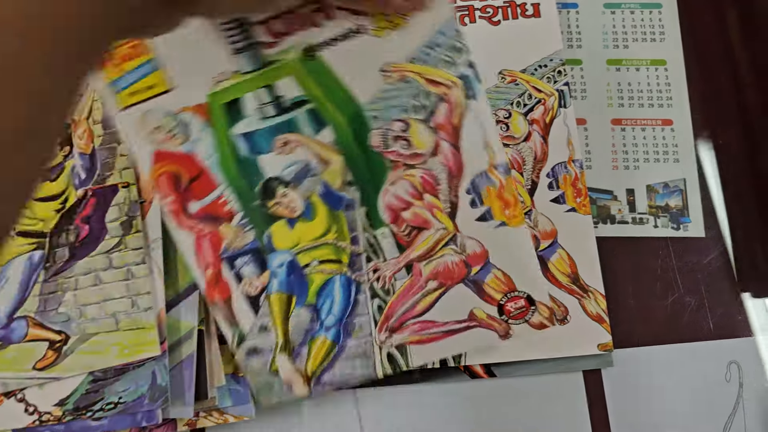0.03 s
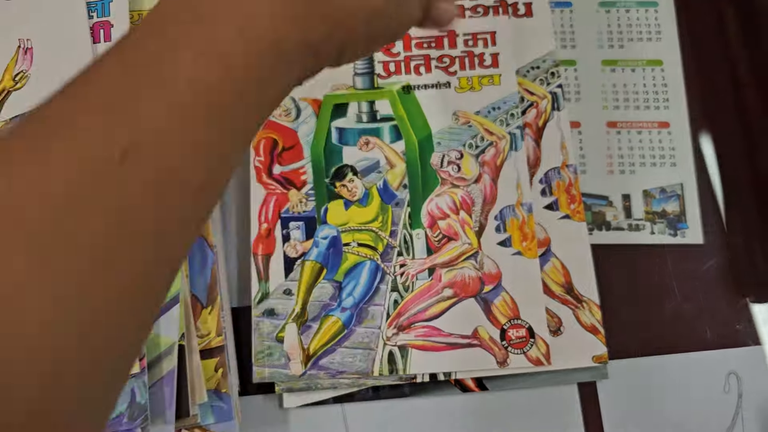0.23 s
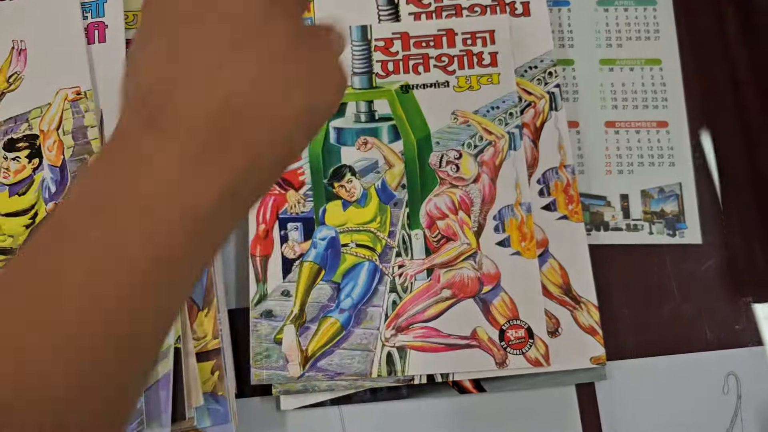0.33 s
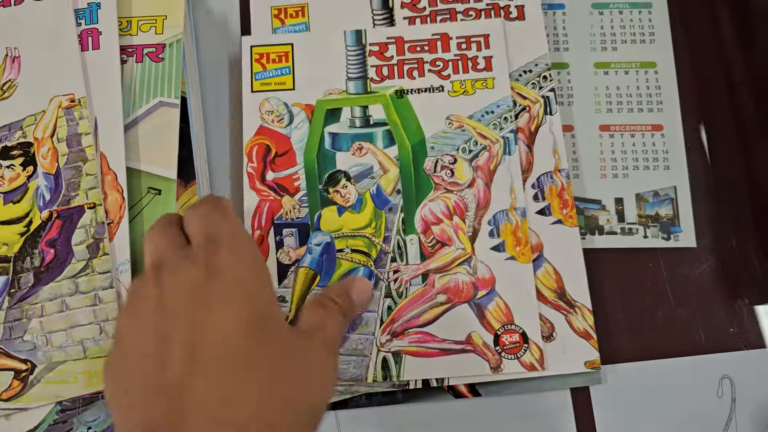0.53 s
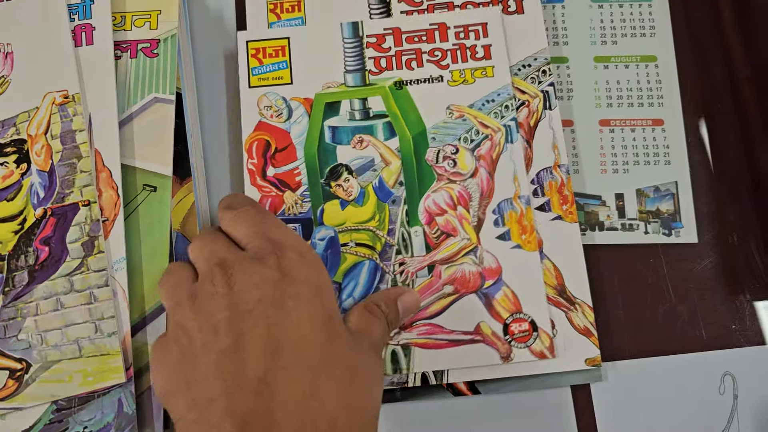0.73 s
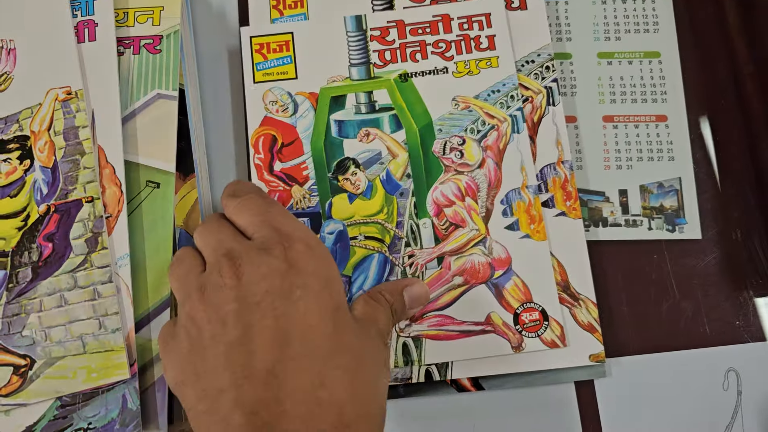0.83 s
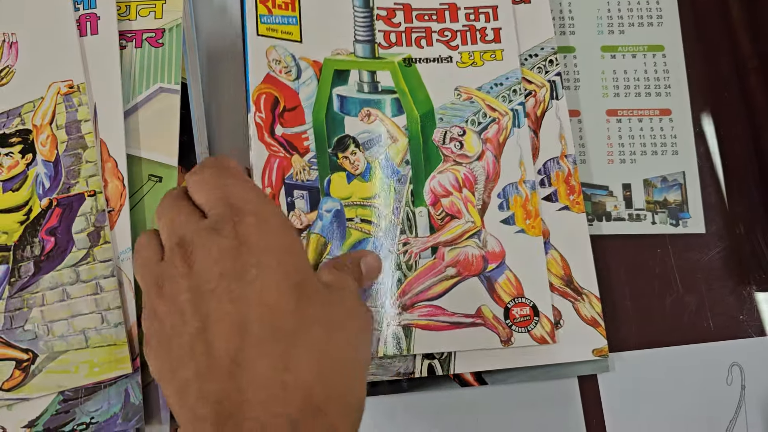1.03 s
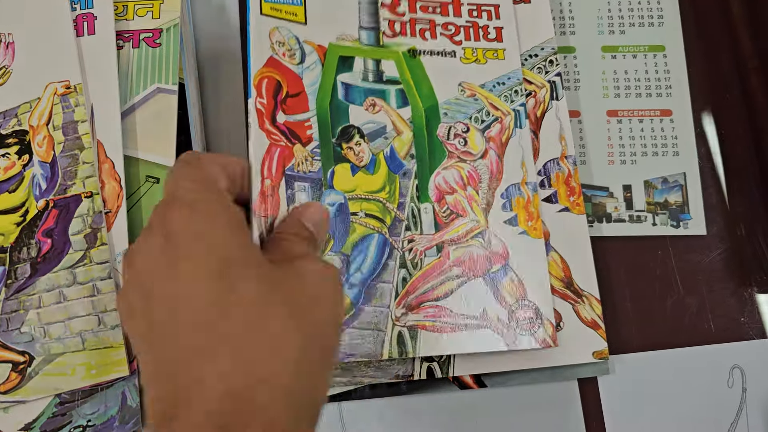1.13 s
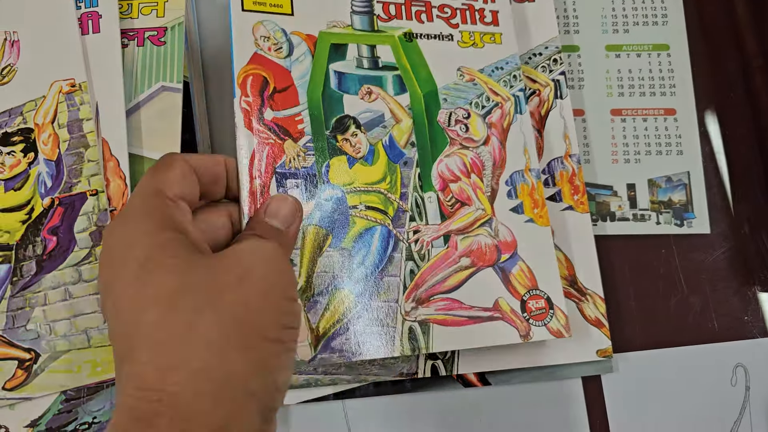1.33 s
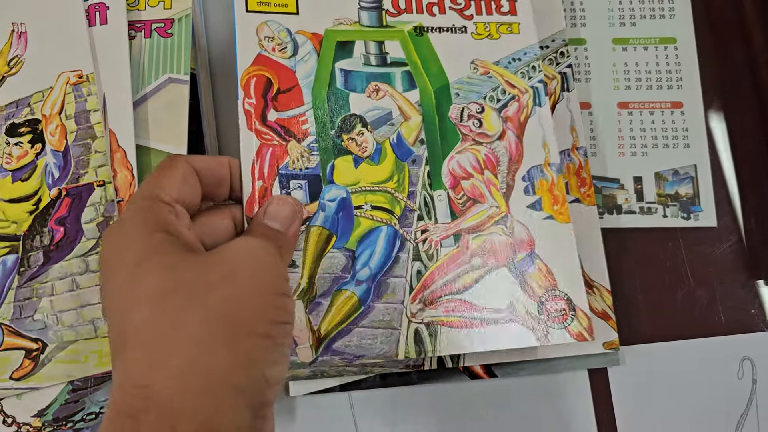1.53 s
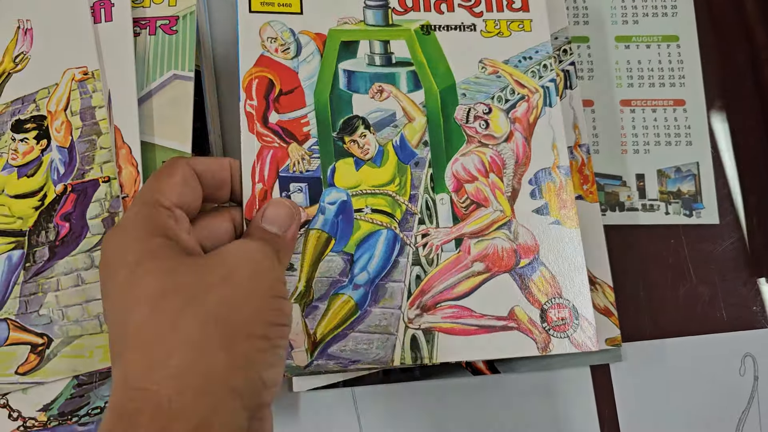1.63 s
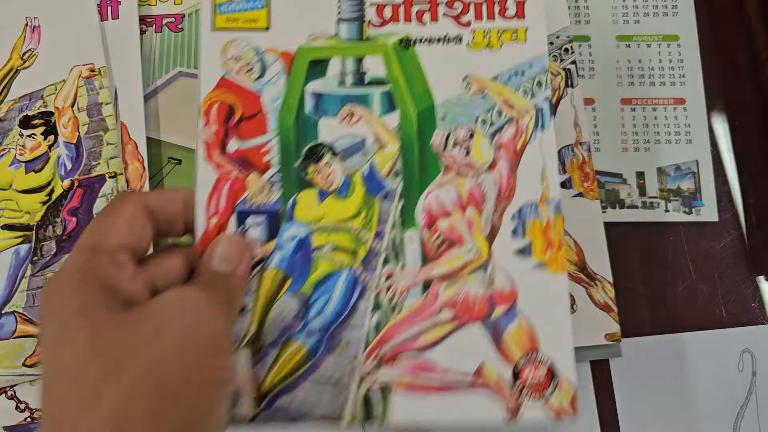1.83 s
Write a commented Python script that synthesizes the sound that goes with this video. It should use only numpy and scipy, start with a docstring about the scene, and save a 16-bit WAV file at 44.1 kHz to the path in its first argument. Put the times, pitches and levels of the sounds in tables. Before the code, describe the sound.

A paperback comic slaps onto a stack with a thud, then is slid straight.

```python
"""Comic laid on a stack

A paperback comic goes onto a stack of others on a table, close to a phone in a small, bare, quiet room.
Its edge ticks on the stack, it falls flat with a slap of squeezed air, the table thuds, the walls echo.
A hand slides it straight, with paper friction, small ticks and a soft press, over a low steady hum."""
import sys
import numpy as np
from scipy import signal
from scipy.fft import rfft, irfft
from scipy.io import wavfile
from scipy.ndimage import uniform_filter1d

SR = 44100
rng = np.random.default_rng(int(sys.argv[2]) if len(sys.argv) > 2 else 0)


def persist_wave(psi):
    """Save psi, clipped to +-1, as 16-bit WAV."""
    counts = np.round(np.clip(psi, -1, 1) * 32767).astype(np.int16)
    wavfile.write(sys.argv[1], SR, np.atleast_2d(counts).T)


N = 83790
TIME_S = np.arange(N) / SR
FREQ_HZ = np.arange(N // 2 + 1) * SR / N


def undb(db):
    """Decibels to gain."""
    return 10 ** (np.asarray(db) / 20)


def read(table, hz=FREQ_HZ):
    """Look up rows of freq_hz, value on a log-frequency axis."""
    points_hz, values = np.array(table, float).T
    return np.interp(np.log(np.maximum(hz, 1)), np.log(points_hz), values)


def unit(x):
    """Scale to rms 1."""
    return x / np.sqrt(np.mean(x ** 2))


def colour(x, table, tilt_db=0):
    """Minimum-phase filter with the given spectrum, tilted per octave about 2 kHz."""
    db = read(table) + tilt_db * np.log2(np.maximum(FREQ_HZ, 400) / 2000)
    cepstrum = irfft(np.log(undb(db)), N)
    cepstrum[1:N // 2] *= 2
    cepstrum[N // 2 + 1:] = 0
    return irfft(rfft(x) * np.exp(rfft(cepstrum)), N)


def pan(pan_db):
    """Left and right gains; pan_db is left minus right."""
    return undb(np.array([[1], [-1]]) * pan_db / 2)


def balance(x, table):
    """Lean each frequency left or right by rows of freq_hz, pan_db."""
    return irfft(rfft(x) * pan(read(table)), N)


def convolve(x, response):
    """Play x through a two-channel response."""
    return signal.fftconvolve(np.atleast_2d(x), response, axes=-1)[:, :N]


def waver(rate_hz):
    """Smooth random drift with rms 1."""
    hold = int(SR / rate_hz)
    steps = np.repeat(rng.standard_normal(N // hold + 2), hold)
    return unit(uniform_filter1d(uniform_filter1d(steps, hold), hold)[:N])


def push(start_s, lag_s=0):
    """One sharp push, reaching the right channel after a lag."""
    out = np.zeros((2, N))
    out[0, int(start_s * SR)] = out[1, int((start_s + lag_s) * SR)] = 1
    return out


def crackle(start_s, decay_s):
    """A short dying burst of tiny paper contacts."""
    age = TIME_S - start_s
    return unit(rng.standard_normal((2, N)) * (age > 0) * np.exp(-np.abs(age) / decay_s)) / np.sqrt(N)


def mode(hz, t60_s):
    """One dying resonance."""
    return np.cos(2 * np.pi * hz * TIME_S) * np.exp(-np.log(1000) * TIME_S / t60_s)


def rub(spectrum, uneven_db, slips_per_s=9000, scatter_db=1.8):
    """Friction: dense tiny slips of uneven size, under a wavering pressure."""
    slips = (rng.random((2, N)) < slips_per_s / SR) * rng.standard_normal((2, N))
    slips *= undb(scatter_db * rng.exponential(size=(2, N)))
    return unit(colour(slips, spectrum)) * undb(uneven_db * waver(44.74))


# How alike the room sounds at the phone's two microphones: freq_hz, correlation
MIC_LIKENESS = [(60, .99), (130, .97), (290, .84), (640, .46), (1400, -.05), (3000, .05), (15000, 0)]

def diffuse():
    """Noise from all sides: alike in both channels in the bass, unrelated in the treble."""
    mid, side = rfft(rng.standard_normal((2, N)))
    likeness = np.clip(read(MIC_LIKENESS), -1, 1)
    spectrum = mid * np.sqrt(1 + likeness) + np.array([side, -side]) * np.sqrt(1 - likeness)
    return irfft(spectrum / np.sqrt(2), N)


# Room tone all around the phone: freq_hz, gain_db
AIR_COLOUR = [(25, -21.5), (50, -8), (80, -8), (120, 2.5), (170, -0.5), (260, 0.5), (330, -11.5), (540, -9),
              (800, -20), (1500, -18.5), (2500, -25), (3800, -31), (4600, -45), (6200, -42), (9000, -67),
              (16000, -60)]
# Its lean to left or right: freq_hz, pan_db
AIR_PAN = [(100, 1), (700, 0.5), (1300, -0.5), (2400, -4), (4400, -17.5), (8000, 3), (15000, -5)]
# Hum, dead centre: pitch_hz, level_db
HUM_TONES = [(167, -57), (215.3, -59), (255, -67.5), (505, -68), (553, -74)]

def room_tone():
    """Low rush of room air with a wavering hum, as from a fan."""
    air = unit(colour(diffuse(), AIR_COLOUR)) * undb(-48.5)
    hum = 0
    for hz, db in HUM_TONES:
        drift = 1 + 0.21 * (waver(11.26) + 1j * waver(10.56))  # in level and phase
        hum += undb(db) * np.sqrt(2) * np.real(drift * np.exp(2j * np.pi * hz * TIME_S))
    return balance(air, AIR_PAN) + hum


# Light strokes, close, right of centre: start_s, length_s, level_db
PAPER_STROKES = [(0, 0.13, -72.5), (1.862, 0.041, -67)]
# Their tone at the phone, with the microphone's resonance: freq_hz, gain_db
STROKE_COLOUR = [(1500, -30), (3500, -10), (5000, -5), (6500, -22), (9500, -35), (10800, -18), (11300, -2),
                 (11700, 0), (12300, -6), (13200, -20), (16000, -35)]

def paper_strokes(fade_s=0.0062):
    """Light paper rubbing, its hiss sharpened near 11.7 kHz by the phone microphone's resonance."""
    level = 0
    for start_s, length_s, db in PAPER_STROKES:
        inside_s = np.minimum(TIME_S - start_s, start_s + length_s - TIME_S)
        level += undb(db) * np.clip(inside_s / fade_s + .5, 0, 1)
    return rub(STROKE_COLOUR, uneven_db=1.5) * level * pan(-5)


# Cover sliding on the stack, close, to the right: time_s, level_db
SLIDE_LEVELS = [(0, -70), (.2, -72), (.26, -52), (0.331, -63), (.39, -46.5), (.45, -51), (0.648, -62),
                (0.798, -60.5), (0.932, -57.5), (1.03, -63.5), (1.13, -61.5), (1.25, -71), (1.4, -62.5),
                (1.52, -68), (1.845, -82), (1.867, -61), (1.9, -61.5)]
# Its broad rustle: freq_hz, gain_db
SLIDE_COLOUR = [(40, -65), (200, 8), (600, 7), (1400, 4), (2200, 2.5), (3300, 6.5), (4200, 4), (5500, -3),
                (7500, -29), (10000, -50), (16000, -46)]

def cover_slide():
    """The comic rubs over the one below as it is pushed straight."""
    time_s, db = np.array(SLIDE_LEVELS).T
    return rub(SLIDE_COLOUR, uneven_db=1.5) * undb(np.interp(TIME_S, time_s, db)) * pan(-9)


# Skin on the glossy cover, close, just left of centre: time_s, level_db
BRUSH_LEVELS = [(0, -70.5), (.2, -69), (.26, -59.5), (.34, -69), (.4, -60.5), (.5, -70), (0.619, -83),
                (0.799, -86), (.89, -75.5), (0.991, -90), (1.11, -70.5), (1.171, -79.5), (1.225, -65.5),
                (1.35, -69.5), (1.5, -90), (1.845, -102), (1.871, -71), (1.9, -74)]
# Its tone at the phone; the peak near 11.6 kHz is the microphone's resonance: freq_hz, gain_db
BRUSH_COLOUR = [(200, -30), (1500, -8), (5000, -2), (7500, -3), (9500, -10), (10700, -5), (11600, 3),
                (12700, -1), (16000, -3)]

def finger_brush():
    """Fingers stroke the cover with faint friction."""
    time_s, db = np.array(BRUSH_LEVELS).T
    return rub(BRUSH_COLOUR, uneven_db=.7) * undb(np.interp(TIME_S, time_s, db)) * pan(3)


# Page edges near the phone: start_s, level_db, tilt_db_per_octave, ring_hz, ring_db, decay_s, pan_db
EDGE_TICKS = [(0.2166, -20, -3, 4280, -24, 0.0012, -2), (0.217, -26, -2.5, 3750, -41, 0.0033, 7),
              (0.2352, -13.5, -0.26, 1130, -27.5, 0.0042, 3.5), (0.2379, -23, 0, 3620, -20, 0.0024, -8),
              (0.386, -25, 2, 4200, -28, 0.0062, -6), (0.895, -35, -2.5, 7300, -17, .003, 13),
              (1.0827, -40.5, 4.5, 3894, -23, 0.0011, 14), (1.135, -26.5, -5, 550, -24, 0.0023, 3),
              (1.3691, -23, -3, 3090, -17.5, 0.0045, 10), (1.371, -30, -1, 3850, -12.5, .002, -7),
              (1.3947, -34.5, -2, 5830, -10, 0.002, -3)]
# Their tone before each one's tilt: freq_hz, gain_db
TICK_COLOUR = [(40, -35), (150, -6.5), (500, 4), (800, 1.5), (1300, 2.5), (2000, -3.5), (3500, 0),
               (6000, -6.5), (9500, -15.5), (13000, -13.5), (16000, -19.5)]

def paper_ticks():
    """Page edges catch and let go in dry snaps, each with its own brightness and brief ring."""
    out = 0
    for start_s, db, tilt_db, ring_hz, ring_db, decay_s, pan_db in EDGE_TICKS:
        ring = np.roll(mode(ring_hz, t60_s=0.0088), int(start_s * SR))
        snap = push(start_s) + undb(2) * crackle(start_s, decay_s) + undb(ring_db) * ring
        out += undb(db) * pan(pan_db) * colour(snap, TICK_COLOUR, tilt_db)
    return out


# Decay of the small bare room, heard from the table: freq_hz, t60_s
ROOM_DECAY = [(100, -0.5), (500, 1.03), (2000, 1.55), (5000, 0.8), (14000, 0.7)]
# Tone of its echo: freq_hz, gain_db
ROOM_COLOUR = [(60, -5), (160, -5.5), (280, 5.5), (400, 6), (540, 6), (800, -6.5), (1600, 2), (3500, -2),
               (7000, 1.5), (15000, -7)]

def wall_echo(delay_s=0.0078, build_s=0.00054):
    """Response of the bare walls: octave bands of noise, ringing longest near 2 kHz."""
    age = np.maximum(TIME_S - delay_s, 0)
    onset = 1 - np.exp(-age / build_s)
    noise, out = rfft(diffuse()), 0
    octave = np.log2(np.clip(FREQ_HZ, 62.5, 16000) / 62.5)
    for k in range(9):
        band = irfft(noise * np.maximum(1 - np.abs(octave - k), 0), N)
        t60_s = read(ROOM_DECAY, 62.5 * 2 ** k)  # negative in the two lowest bands: they swell late
        out += band * unit(onset * np.exp(-np.log(1000) * age / t60_s)) / np.sqrt(N)
    return colour(out, ROOM_COLOUR)


# Blows that reach the table: start_s, level_db, contact_s
TABLE_BLOWS = [(0.2332, -16.5, 0.0054), (0.3605, -1.5, 0.0048), (0.3731, 6, 0.0057), (0.3861, -5.5, 0.0044),
               (0.4253, -10, 0.0051), (0.443, -11.5, .003), (0.471, -5.5, 0.0052), (0.4826, -4.5, 0.0041),
               (0.4944, -10.5, 0.003), (0.558, -9.5, 0.0036), (0.703, -10.5, 0.0031), (0.894, -7.5, 0.003),
               (0.951, -11.5, 0.003), (1.028, -18, .004)]
# Table and stack, close and centred: pitch_hz, level_db, t60_s
TABLE_MODES = [(63, -59, 0.1), (81.5, -29, 0.075), (93.7, -45.5, 0.68), (116.9, -36, 0.6),
               (168.6, -40, 0.58), (256, -45, 0.12)]

def table_thud():
    """Soft half-sine pushes of the comic and the hand ring the low modes of the table."""
    force = 0
    for start_s, db, contact_s in TABLE_BLOWS:
        pulse = np.sin(np.pi * np.clip((TIME_S - start_s) / contact_s, 0, 1))
        force += undb(db) * pulse * np.pi / (2 * contact_s * SR)
    ring = sum(undb(db) * mode(hz, t60_s) for hz, db, t60_s in TABLE_MODES)
    return convolve(force, np.array([ring, ring]))


# The cover lands part by part, close, a little to the left: start_s, level_db, pan_db
SLAP_CONTACTS = [(0.3610, -.8, 6), (0.36235, 0, 5), (0.3628, -4.5, -7)]
# Air and paper of the slap, straight to the phone: freq_hz, gain_db
SLAP_COLOUR = [(60, -15), (150, -9), (250, 4), (330, 9), (600, 3), (1100, 3), (1550, -3), (2500, -13),
               (3200, -12), (4800, -19), (5900, -34), (7000, -35), (10000, -46), (15000, -44)]
# The stack under the slap: pitch_hz, level_db, t60_s, pan_db
STACK_MODES = [(280, -37.5, 0.038, 24.5), (415, -29.5, 0.021, -5), (623, -26.5, 0.01, 4),
               (1437, -37.5, 0.024, 13.5), (1990, -38.5, 0.021, -9), (3150, -30, 0.018, -15),
               (4880, -35, 0.012, 12)]
# Pages closing after each contact: freq_hz, gain_db
FLUTTER_COLOUR = [(100, -22), (400, -8), (1100, -2), (2000, -3), (3200, 2), (5000, 0), (5900, -15),
                  (7000, -9), (8500, -20), (10000, -24), (11800, -12), (15000, -12)]
# Their lean to left or right: freq_hz, pan_db
FLUTTER_PAN = [(1500, 10), (2700, 0), (4500, -2), (8000, 4), (13000, 8)]

def slap(muffle_hz=5400):
    """The cover lands flat: air is squeezed out, the stack rings briefly and the pages close."""
    pushes = sum(undb(db) * pan(pan_db) * push(start_s, lag_s=0.00014)
                 for start_s, db, pan_db in SLAP_CONTACTS)
    pages = sum(undb(db - 8) * crackle(start_s, decay_s=.0016) for start_s, db, _ in SLAP_CONTACTS)
    flutter = balance(colour(pages, FLUTTER_COLOUR), FLUTTER_PAN)
    ring = sum(undb(db) * pan(pan_db) * mode(hz, t60_s) for hz, db, t60_s, pan_db in STACK_MODES)
    ring = signal.sosfilt(signal.butter(4, muffle_hz, fs=SR, output="sos"), ring)  # the ring is kept soft above about 5.4 kHz
    return colour(pushes, SLAP_COLOUR) + convolve(pushes, ring) + flutter


# The slap as it leaves the table for the walls: freq_hz, gain_db
SLAP_SPREAD = [(70, 3), (160, -17), (300, 2), (600, 8.5), (1000, 9), (1500, 4), (2500, -9), (4500, -11.5),
               (7000, -24), (10000, -31), (15000, -26)]

def slap_to_walls():
    """The cover's first contact sends one push out into the room."""
    return colour(push(SLAP_CONTACTS[0][0]), SLAP_SPREAD)


def scene():
    """Handling, thud and slap close to the phone; the ticks and the slap also come back off the walls."""
    walls, ticks = wall_echo(), paper_ticks()
    echo = convolve(slap_to_walls() + undb(-4.5) * ticks.mean(axis=0), walls)
    impacts = slap() + ticks + table_thud()
    friction = cover_slide() + finger_brush() + paper_strokes()
    return impacts + echo + friction + room_tone()


def record(dry):
    """The phone cuts the deepest bass and the top."""
    thin = signal.sosfilt(signal.butter(1, 20, "high", fs=SR, output="sos"), dry)
    return signal.sosfilt(signal.ellip(10, .2, 80, 16100, fs=SR, output="sos"), thin)


dry = scene()
out = record(dry)
persist_wave(out)
```